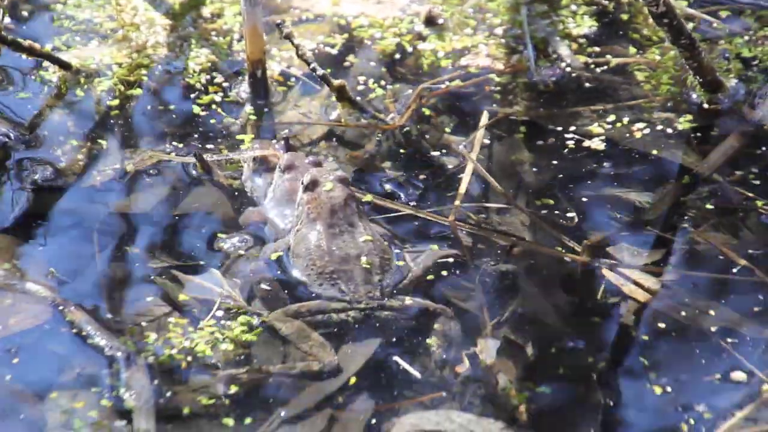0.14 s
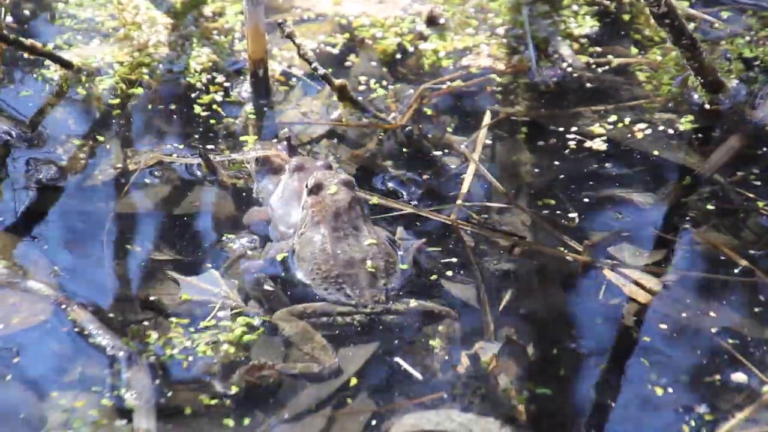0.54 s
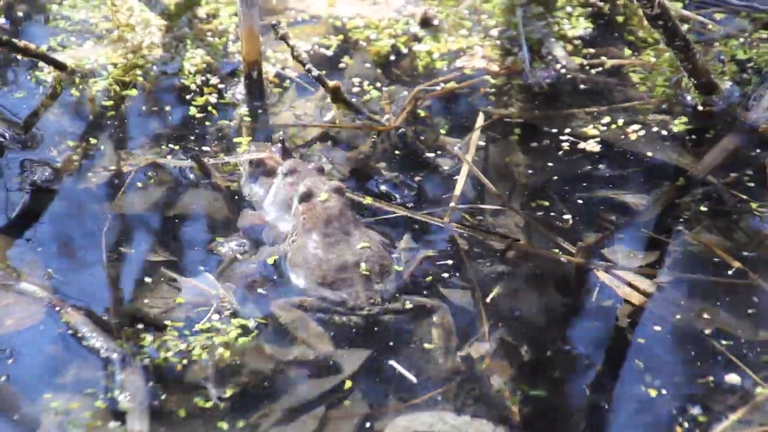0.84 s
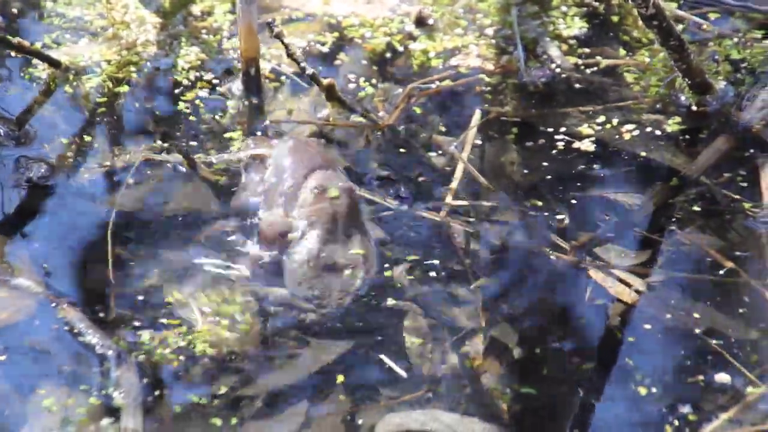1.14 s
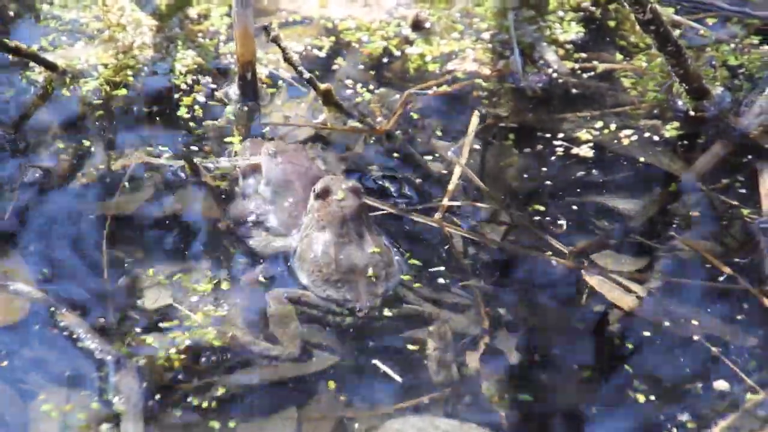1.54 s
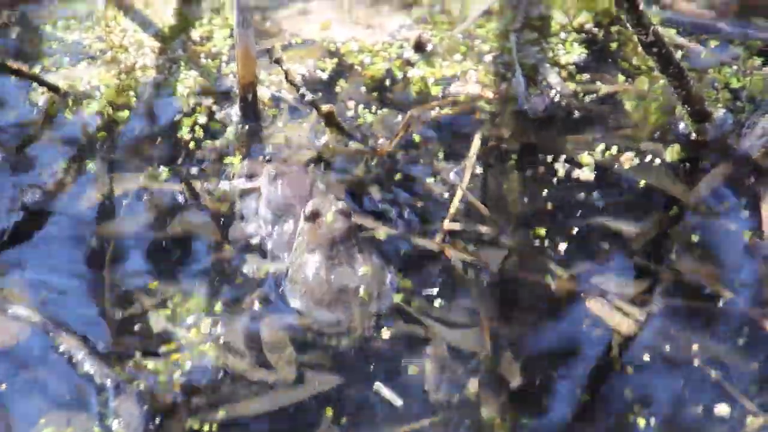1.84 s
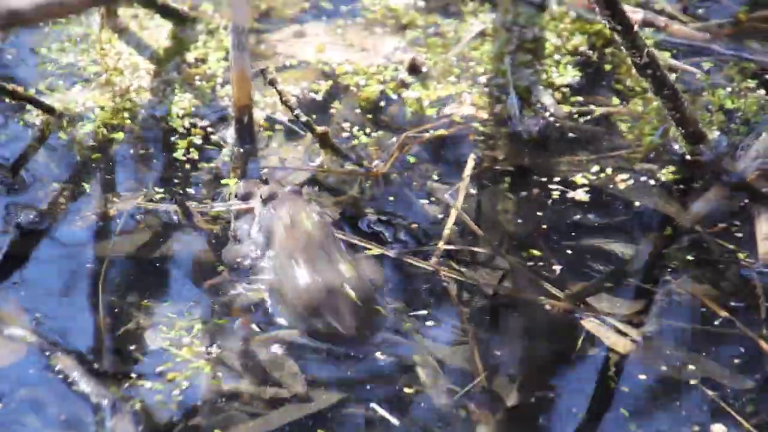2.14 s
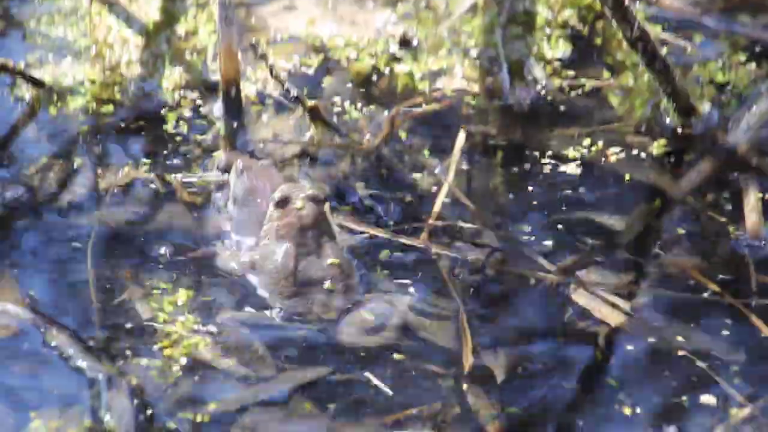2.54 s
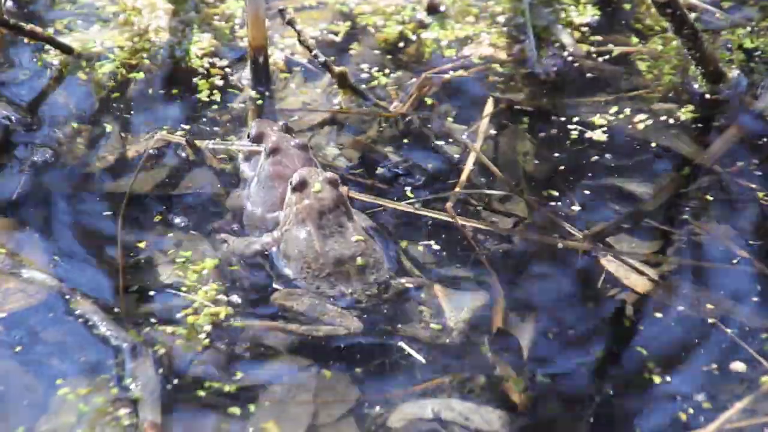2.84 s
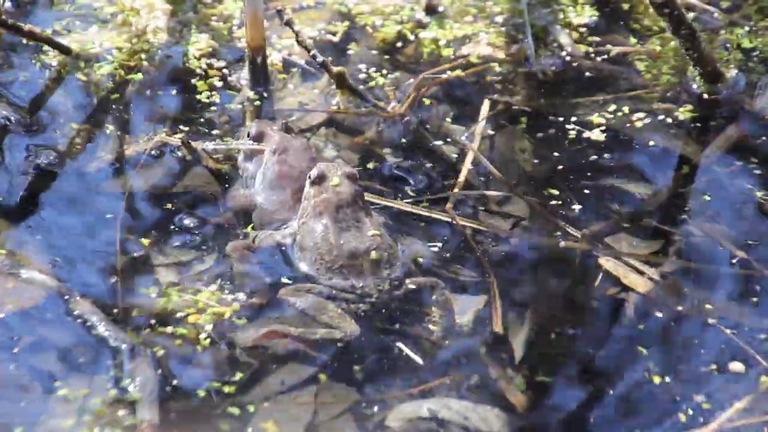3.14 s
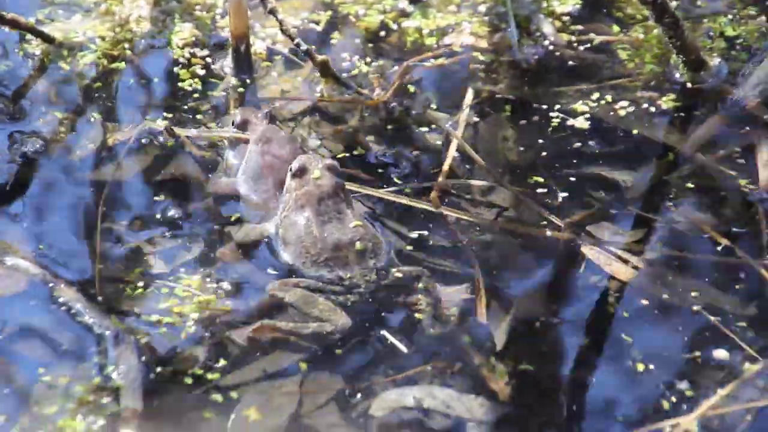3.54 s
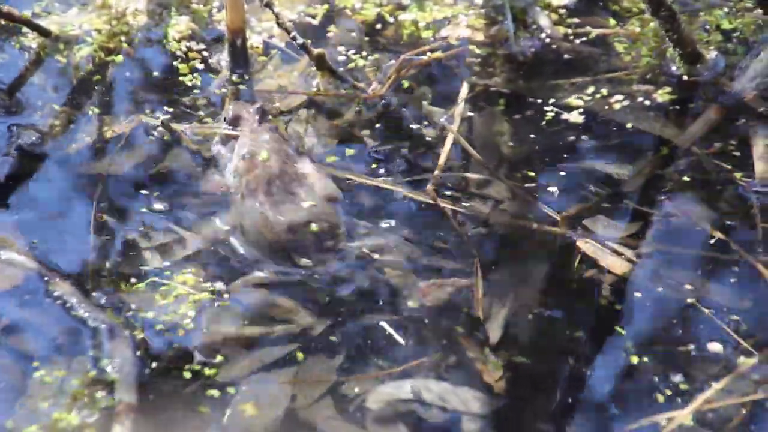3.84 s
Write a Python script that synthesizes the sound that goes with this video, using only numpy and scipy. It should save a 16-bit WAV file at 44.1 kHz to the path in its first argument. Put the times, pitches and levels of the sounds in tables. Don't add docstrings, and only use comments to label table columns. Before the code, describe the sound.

Low wind thuds on a close outdoor microphone come in puffs and build to a heavy gust around three seconds; tiny dry snaps, faint plops and a thin insect buzz sit over soft hiss.

```python
import sys
import numpy as np
from scipy import signal
from scipy.io import wavfile
from scipy.ndimage import uniform_filter1d

SR = 44100
rng = np.random.default_rng(int(sys.argv[2]) if len(sys.argv) > 2 else 0)


def boost(x):
    u = np.asarray(x, float) / 20
    return 10 ** u


def master_out(mix):
    frames = np.transpose(np.atleast_2d(mix))
    ceiling = np.clip(frames, -1, 1)
    pcm = np.round(ceiling * 32767).astype(np.int16)
    wavfile.write(sys.argv[1], SR, pcm)


N = 176400


def rms_one(x):
    return x / np.sqrt(np.mean(x ** 2) + 1e-20)


def drift(rate_hz):
    pole = np.exp(-2 * np.pi * rate_hz * 40 / SR)
    noise = rng.standard_normal(N // 40 + 2002)
    slow = signal.lfilter([1], [1, -2 * pole, pole ** 2], noise)[2000:]
    return np.interp(np.arange(N) / 40, np.arange(len(slow)), rms_one(slow))


def band(x, low_hz, high_hz):
    sos = signal.butter(2, [low_hz, min(high_hz, .45 * SR)], "band", fs=SR, output="sos")
    return signal.sosfilt(sos, x)


def banded_noise(spectrum, patchy_db, shared):
    hz, db = np.transpose(spectrum)
    octaves = np.log2(min(1.4 * hz[-1], 22000) / hz[0])
    edges = hz[0] * 2 ** np.arange(0, octaves, 1 / 3)
    together = drift(9)
    white = rng.standard_normal((2, N + SR // 2))
    out = 0
    for k, (low, high) in enumerate(zip(edges, edges[1:])):
        level = np.interp(np.log(low * high) / 2, np.log(hz), db)
        flicker = patchy_db * (shared * together + drift(6.1))
        out = out + boost(level + flicker) * band(white[k % 2], low, high)[-N:]
    return rms_one(out)


def eddies(rows):
    core_spread, wake_spread = 0.32, 1.72
    wake_db, flutter_db = -22, -14.5
    sag = 0.31
    out = np.zeros(N)
    flutter = band(rng.standard_normal(N), 35, 201.5)
    flutter = rms_one(band(flutter, 35, 201.5))
    for (s, db, hz, length), chance in zip(rows, rng.random(len(rows))):
        i = np.arange(max(int((s - .08) * SR), 0), min(int((s + .08) * SR), N))
        t = i / SR - s
        core = np.exp(-.5 * (t / (core_spread * length)) ** 2)
        wake = np.exp(-.5 * (t / (wake_spread * length)) ** 2)
        cycles = np.cumsum(hz * (1 + sag * (core - .7))) / SR
        start_turn = 0.12 + 0.4 * (chance - .5)
        swirl = np.cos(2 * np.pi * (cycles - cycles[np.argmax(core)] + start_turn))
        turbulence = (boost(wake_db) * wake + boost(flutter_db) * core) * flutter[i]
        out[i] += boost(db + 1) * (core * swirl + turbulence)
    return out


def first_eddies():
    # t/s, peak level/dB, swirl f/Hz, length/s
    early = [(0.346, -33, 98, 0.037), (1.115, -26.5, 135, 0.013), (1.132, -27, 104, 0.023),
             (1.179, -23.5, 116, 0.0075), (1.203, -27, 105, 0.009), (1.53, -40, 118, 0.025),
             (1.556, -30, 73, 0.021), (1.657, -21.5, 86, 0.029), (1.674, -12, 124, 0.0057),
             (1.71, -25, 124, 0.012), (1.735, -31, 101, 0.019), (1.765, -21.5, 78, 0.02),
             (1.818, -23, 167, 0.007), (1.848, -19.5, 139, 0.019), (1.876, -15, 117, 0.0094),
             (1.896, -45, 153, 0.019), (1.914, -23.5, 90, 0.028), (1.937, -37, 98, 0.011),
             (1.953, -27, 93, 0.013), (1.993, -30, 93, 0.016), (2.468, -27.5, 81, 0.039),
             (2.561, -33, 79, 0.023), (2.602, -36, 95, 0.015), (2.627, -47, 99, 0.024),
             (2.644, -16, 82, 0.0099), (2.685, -25, 81, 0.025), (2.715, -15.5, 120, 0.01),
             (2.733, -17.5, 112, 0.0095), (2.76, -27, 89, 0.016)]
    # t/s, peak level/dB, swirl f/Hz, length/s
    late = [(2.811, -17.5, 98, 0.0075), (2.835, -20.5, 81, 0.01), (2.866, -15, 107, 0.0057),
            (2.886, -31, 91, 0.026), (2.907, -32, 110, 0.061), (2.938, -21, 96, 0.01),
            (2.971, -18.5, 125, 0.007), (3, -25, 74, 0.026), (3.028, -12, 165, 0.008),
            (3.058, -5, 165, 0.011), (3.119, -18, 122, 0.018), (3.17, -19, 85, 0.018),
            (3.202, -16, 105, 0.017), (3.223, -26, 117, 0.0086), (3.255, -21.5, 112, 0.026),
            (3.288, -34, 94, 0.012), (3.308, -12, 91, 0.012), (3.33, -21, 115, 0.021),
            (3.37, -30, 119, 0.013), (3.449, -19.5, 103, 0.01), (3.468, -32.5, 121, 0.025),
            (3.570, -9, 150, 0.014), (3.606, -47, 83, 0.041), (3.767, -25, 94, 0.0083),
            (3.791, -27, 130, 0.01), (3.815, -19.5, 88.7, 0.01), (3.969, -26, 75, 0.027)]
    # t/s, peak level/dB, swirl f/Hz, length/s
    late_more = [
        (3.128, -29, 520, 0.0044),
        (3.046, -13, 175, 0.011),
        (3.124, -11, 47, 0.011),
        (3.114, -11.5, 204, 0.01),
        (3.572, -16, 292, 0.0072),
        (3.558, -14, 70, 0.0069),
        (3.752, -27, 56, .014),
    ]
    return eddies(early + late + late_more)


def more_eddies():
    # t/s, peak level/dB, swirl f/Hz, length/s
    further = [(.385, -36, 99, 0.021), (.6, -41, 85, 0.03), (1.225, -36, 100, .012),
               (1.375, -40.5, 50, .035), (1.59, -36, 55, 0.035), (2.639, -27, 275, 0.0061),
               (2.72, -27.5, 300, 0.0073), (2.878, -17, 60, 0.015), (2.885, -30.5, 330, .006),
               (2.92, -29, 100, 0.015), (2.937, -30, 454, .006), (2.948, -29, 220, 0.01),
               (3.0248, -11, 430, .0012), (3.073, -32, 109, .012), (3.136, -22.5, 170, .008),
               (3.285, -21.5, 100, 0.011), (3.308, -30.5, 280, 0.0064), (3.35, -21, 96, 0.026),
               (3.455, -25, 75, .022), (3.495, -35, 90, .02), (3.562, -22, 110, 0.014), (1.69, -30, 70, .02),
               (1.86, -29, 275, 0.0084), (1.668, -32.5, 297, .006), (3.59, -24, 94, 0.024),
               (3.65, -39, 60, 0.033), (3.781, -25.5, 60, 0.024), (3.955, -32, 114, 0.017),
               (3.991, -26, 88.6, 0.013)]
    return eddies(further)


def churn():
    # t/s, level/dB
    gust = [(0, -72), (.3, -52), (.35, -42), (.43, -70), (1.05, -52), (1.15, -30), (1.27, -60), (1.5, -50),
            (1.7, -37), (1.97, -40), (2.06, -56), (2.6, -49), (2.72, -37), (3.33, -39), (3.4, -48),
            (3.65, -41), (3.9, -58), (4, -37)]
    # f/Hz, spectral level/dB per Hz
    churn_colour = [(12, -36), (20, -37), (44, 11.5), (113, -9), (225, -24.5), (400, -22), (520, -29),
                    (880, -120)]
    s, db = np.transpose(gust)
    wind_db = np.interp(np.arange(N) / SR, s, db)
    return boost(wind_db) * banded_noise(churn_colour, patchy_db=2.0, shared=.7)


def plops():
    # t/s, level/dB, f/Hz
    drops = [
        (3.674, -29.5, 470),
        (3.718, -30, 457),
        (3.752, -39, 600),
    ]
    out, t = np.zeros(N), np.arange(SR // 20) / SR
    for s, db, hz in drops:
        tone = np.sin(2 * np.pi * hz * t * (1 + 6 * t))
        out[int(s * SR):int(s * SR) + len(t)] += boost(db - 60 * t / 0.042) * tone
    return out


def ticks():
    # t/s, level/dB, centre f/Hz, decay/s
    snaps = [(0.183, -55, 12000, .006), (.338, -58, 8800, 0.07), (.433, -57, 11500, .008),
             (.472, -43.5, 2900, 0.0095), (0.471, -45, 5540, 0.011), (0.4717, -48, 10500, 0.007),
             (0.572, -44, 3600, 0.024), (.578, -49, 9000, 0.0054), (.657, -50, 7500, .006),
             (.697, -54, 7000, .02), (.846, -59, 14000, .016), (.881, -59, 13500, .008),
             (1.113, -58, 13000, .004), (1.222, -55, 12000, .004), (1.242, -43, 4700, 0.004),
             (1.312, -57, 11500, .012), (1.67, -54, 11500, .005), (2.004, -56, 12000, .015),
             (2.28, -47, 5000, .006), (2.312, -45, 11200, 0.0056), (2.321, -54.5, 9000, 0.023),
             (2.52, -56, 4500, .03), (2.758, -55, 10500, .006), (2.856, -54, 11000, 0.0055),
             (2.97, -60, 11400, 0.026), (3.155, -56, 6030, .008), (0.725, -55, 9800, .005),
             (3.884, -58, 12300, .012), (3.904, -55, 11500, .005), (3.92, -55, 11500, .005),
             (3.535, -60, 9000, .02), (3.695, -61, 13000, .006), (3.8, -62, 13000, .012),
             (3.962, -52, 7000, .005), (.472, -48, 14000, .005), (.472, -51, 4000, .008),
             (1.243, -50, 7500, .004), (3.225, -57, 8000, 0.018)]
    snap_s = 0.004
    pole = np.exp(-2 * np.pi * 4000 / SR)
    out, t = np.zeros(N + SR), np.arange(SR // 10) / SR
    for (s, db, hz, decay), noise in zip(snaps, rng.standard_normal((len(snaps), SR // 10))):
        half_width = 0.37 * (snap_s / decay) ** 0.36
        dulled = signal.lfilter([1], [1, -pole], noise)
        ring = rms_one(band(dulled, hz * 2 ** -half_width, hz * 2 ** half_width))
        rise_s = 0.0011 * max(decay / snap_s, 1)
        envelope = np.exp(-2 * t / decay) * np.minimum(t / rise_s, 1)
        out[int(s * SR):int(s * SR) + len(t)] += boost(db + 1.5) * ring * envelope
    return out[:N]


def rustle():
    crackles_per_s = 600 * boost(3.5 * drift(14))
    born = rng.random(N) < crackles_per_s / SR
    sizes = boost(2.9 * np.minimum(rng.exponential(1, N), 2)) * born
    bursts = signal.lfilter([1], [1, -.985], sizes) * rng.standard_normal(N)
    return boost(-69.5) * rms_one(band(bursts, 5500, 13000))


def insects():
    # start t/s, end t/s, f/Hz, level/dB, waver width/Hz
    buzzes = [
        (3.27, 3.725, 6810, -62, 115),
        (3.944, 4.102, 11980, -61, 150),
    ]
    out, t = 0, np.arange(N) / SR
    for start, end, hz, db, waver_hz in buzzes:
        progress = (t - start) / (end - start)
        arch = 70 * np.sin(np.pi * progress * 1.3)
        pitch = hz + waver_hz * drift(300) + arch
        tone = np.sqrt(2) * np.sin(2 * np.pi * np.cumsum(pitch) / SR)
        gate = np.clip(np.minimum(t - start, end - t) / .012, 0, 1)
        fade_db = 8 * progress.clip(0, 1) ** 6
        throb_db = 4.2 * drift(45)
        out = out + gate * boost(db - fade_db + throb_db) * tone
    return out


def leaves():
    # f/Hz, spectral level/dB per Hz
    leaf_colour = [(880, -21.5), (1500, 0), (1900, -5.5), (2450, -2.5), (2780, -7), (8700, -19),
                   (15700, -31)]
    return boost(-51.5) * banded_noise(leaf_colour, patchy_db=.4, shared=.9)


def far_traffic():
    # f/Hz, spectral level/dB per Hz
    far_colour = [(15, -39), (25, -7), (103, -2), (189, -4), (594, -4.5), (1170, -9), (1800, -17.5),
                  (2340, -50), (3960, -120)]
    return boost(-41) * banded_noise(far_colour, patchy_db=0.78, shared=0.11)


def scene():
    wind = first_eddies() + more_eddies() + churn()
    near = plops() + ticks() + rustle() + insects()
    return (wind + near + leaves() + far_traffic())[None]


def top_cut(x):
    return signal.sosfilt(signal.butter(12, 15830, fs=SR, output="sos"), x)


def record(dry):
    limit, duck_from_db, duck_share, recover_db_per_s = 1.6, -8, 0.29, 43
    low_cut = signal.butter(1, 18, "high", fs=SR, output="sos")
    dry = limit * np.tanh(signal.sosfilt(low_cut, dry) / limit)
    level_db = 10 * np.log10(uniform_filter1d(dry[0] ** 2, size=441) + 1e-12)
    over = np.maximum(level_db - duck_from_db, 0)
    fall = recover_db_per_s * np.arange(N) / SR
    held = np.maximum.accumulate(over + fall) - fall
    duck = uniform_filter1d(held, size=441)
    return top_cut(dry * boost(-duck_share * duck))


dry = scene()
out = record(dry)
master_out(out)
```